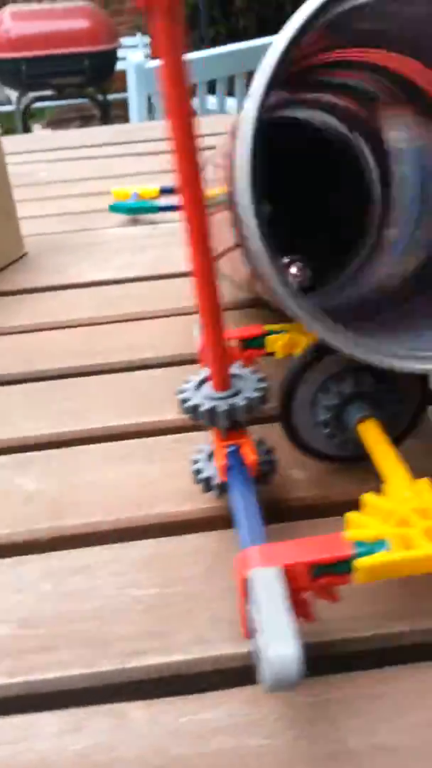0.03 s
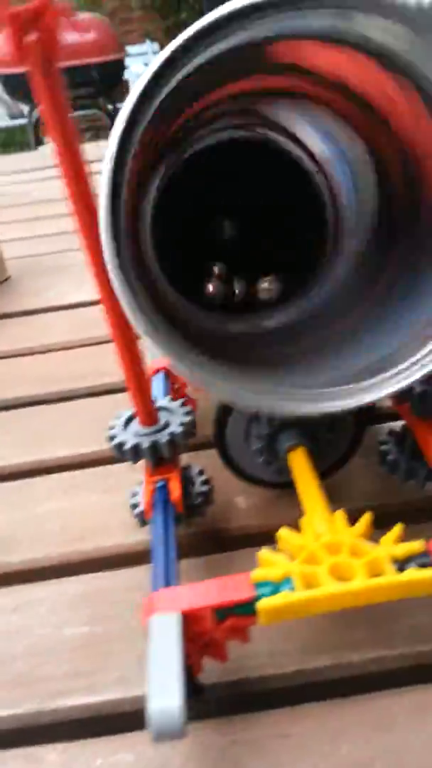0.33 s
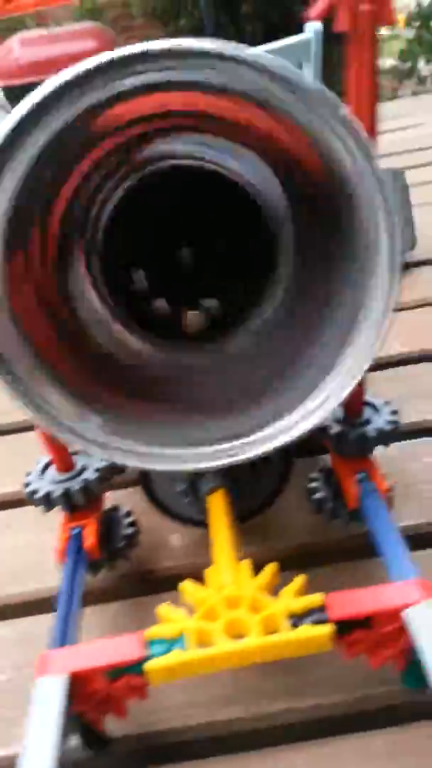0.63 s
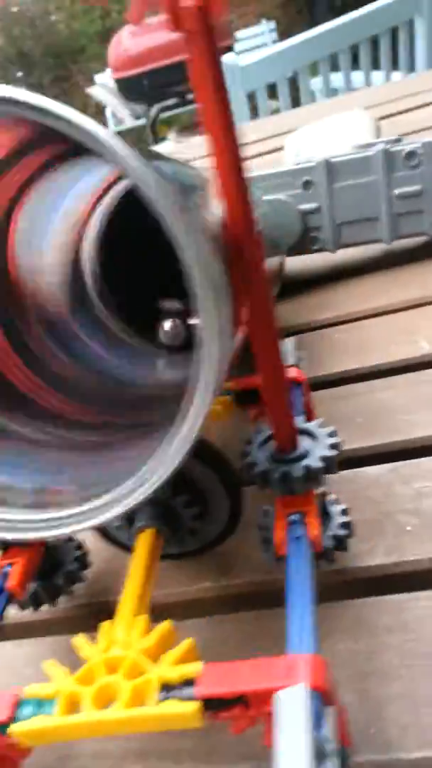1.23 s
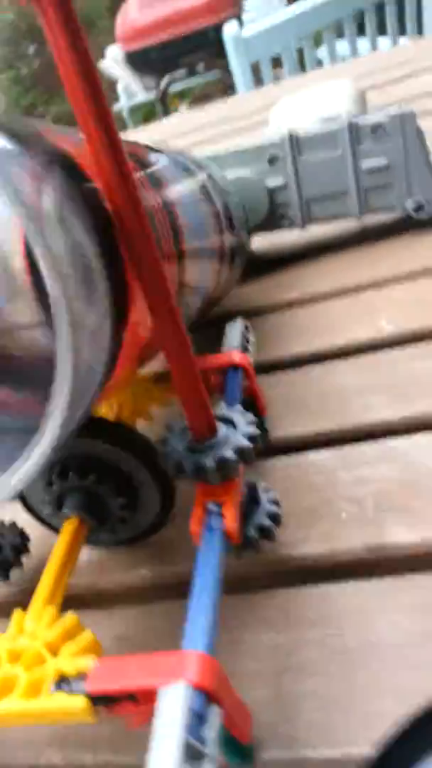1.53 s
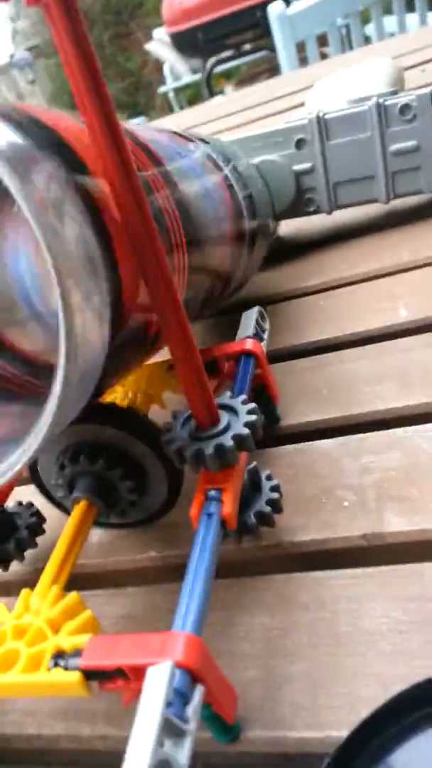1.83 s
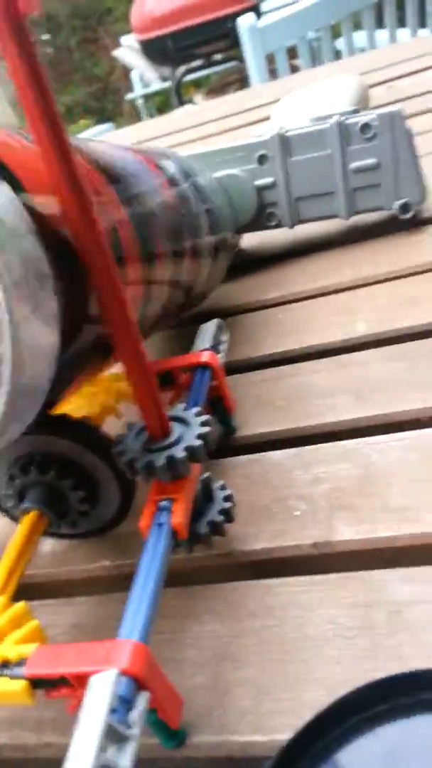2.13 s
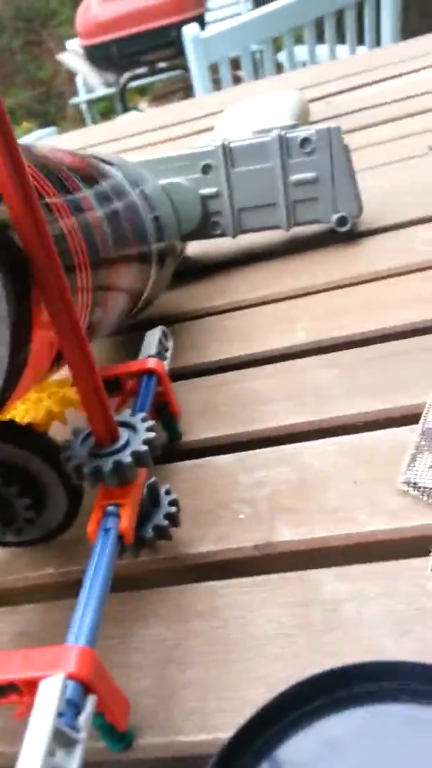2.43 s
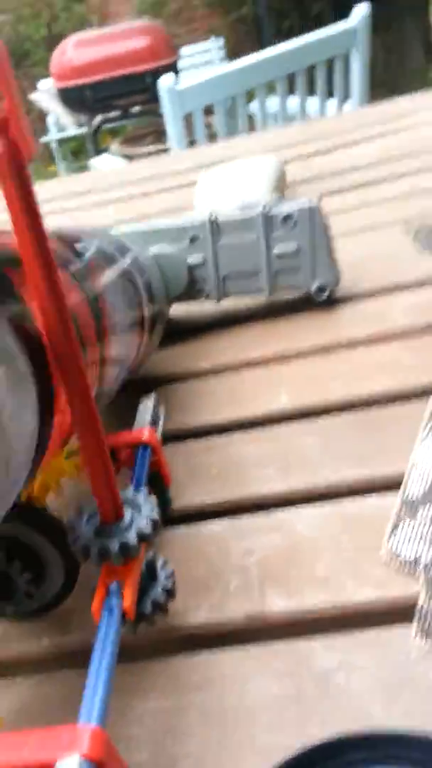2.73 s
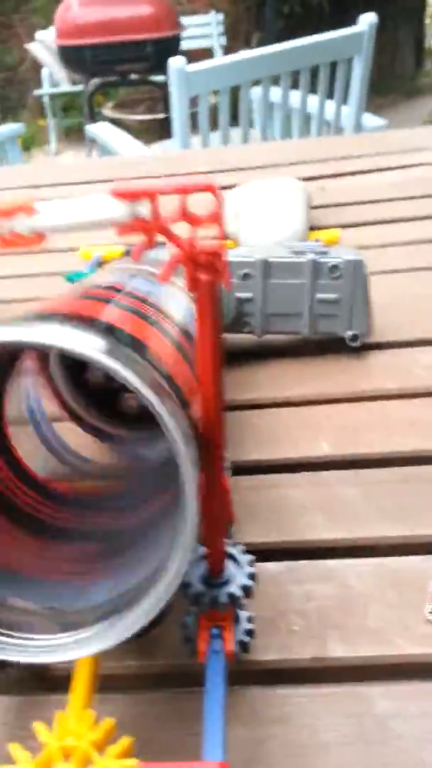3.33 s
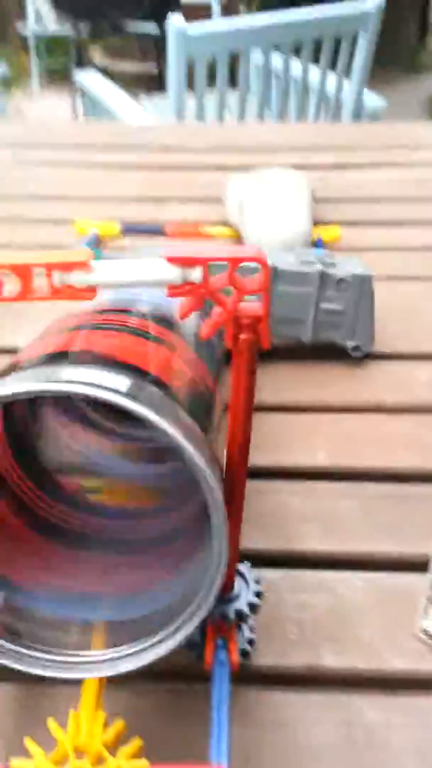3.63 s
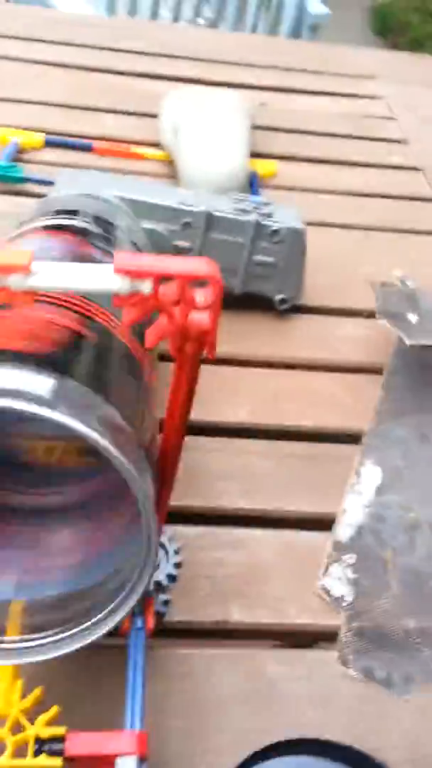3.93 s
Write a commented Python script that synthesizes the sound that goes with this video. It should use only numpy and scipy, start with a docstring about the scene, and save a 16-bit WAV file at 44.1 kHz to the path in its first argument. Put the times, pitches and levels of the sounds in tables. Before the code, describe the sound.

Small geared motor whirring steadily, with metal balls clicking and knocking inside a rotating jar.

```python
"""Outdoors, on a wooden table: a toy motor turns a jar of steel balls through plastic gears.
The frame rumbles on the table and chafes under strain. The gear teeth rasp in their housing;
the motor whirs and surges once per turn of a slow gear. The balls tumble: they knock the jar,
whose air rings with a hollow note, and click against each other.
A close microphone swings from the front of the jar to beside the gears and back."""
import sys
import numpy as np
from scipy import signal
from scipy.fft import rfft, irfft
from scipy.io import wavfile

SR = 44100
rng = np.random.default_rng(int(sys.argv[2]) if len(sys.argv) > 2 else 0)


def output_pcm(signal):
    """Save a mono or channel-first signal as 16-bit PCM at the path in sys.argv[1].

    Samples are clipped to [-1, 1] before scaling.
    """
    pcm = np.clip(np.atleast_2d(signal).T, -1, 1) * 32767
    wavfile.write(sys.argv[1], SR, np.round(pcm).astype(np.int16))


N = 176400
T = np.arange(N) / SR

# microphone swing (leaves front [s], reaches gears [s], leaves gears [s], back in front [s])
MIC_SWING_S = [.6, .95, 2.9, 3.35]
# frame on the table (frequency [Hz], relative density [dB])
RUMBLE_SPECTRUM = [(50, -21.5), (115, -1.5), (180, -6), (260, 9.5), (450, 9), (700, -13), (2000, -57)]
# frame rubs (start [s], length [s])
RUBS = [(0.71, 0.18), (0.944, 0.13), (3.786, 0.13)]
# plastic on plastic (frequency [Hz], relative density [dB])
CHAFE_SPECTRUM = [(600, -5), (1500, 6), (3300, 7.5), (4500, -32)]
# teeth in the housing (frequency [Hz], relative density [dB])
RASP_SPECTRUM = [(500, -3), (800, -5.5), (1500, -4.5), (2100, 2), (2550, 0), (2900, 4), (3300, -0.5),
                 (3950, -3.5), (4300, 2.5), (5030, 3), (6300, -2), (6800, -1.5), (7400, -5.5), (8050, -4),
                 (10000, -11.5), (15000, -29.5)]
# rasp envelope (time [s], level [dB])
RASP_ENVELOPE = [(0, -24.5), (.6, -24.5), (1.1, -23), (2.5, -21.5), (3.05, -25), (3.4, -22.5), (3.7, -24),
                 (4, -23)]
# motor shaft (time [s], mean speed [rev/s], surge depth [rev/s])
MOTOR_SPEED = [(0.0, 157.6, 1.3), (0.16, 158.3, 1.9), (0.4, 157.9, -0.3), (0.64, 159.9, 1.3),
               (0.8, 156.4, 3.9), (0.88, 158.0, 1.8), (1.12, 156.3, 2.0), (1.36, 159.6, 2.6),
               (1.44, 159.0, 0.6), (1.68, 158.8, 2.2), (1.76, 156.7, 2.8), (2.0, 159.8, 0.9),
               (2.08, 157.2, 2.6), (2.32, 158.2, 2.0), (2.4, 157.2, -0.7), (2.64, 159.4, 1.0),
               (2.78, 156.6, 3.4), (2.96, 158.4, 2.2), (3.12, 158.3, 2.5), (3.28, 159.3, 0.9),
               (3.44, 156.6, -0.2), (3.68, 159.0, 0.6), (3.76, 156.2, 2.1), (4.0, 157.4, 1.5)]
# motor and gear lines (order [x shaft speed], level in front [dB], level beside the gears [dB])
MOTOR_LINES = [(9, -39, -42), (10, -42.5, -40.5), (11.25, -45, -44), (12, -36.5, -41), (13, -35.5, -35.5),
               (14, -46, -42), (15, -42, -40), (16, -41, -40), (19, -50, -44), (20, -50, -42),
               (21, -40, -43), (23, -40.5, -46), (24, -48, -45), (27, -47, -38.5), (29, -35, -39),
               (30, -50, -42), (31, -37.5, -33), (32, -34, -34), (33, -42, -41), (34, -45, -41),
               (36, -46, -39.5), (43, -44, -43)]
# whine of the first gear mesh (time [s], level [dB])
WHINE_ENVELOPE = [(0, -32), (.65, -29), (.87, -34), (1.1, -30), (1.45, -26.5), (2.6, -25), (3.2, -29),
                  (3.6, -30), (4, -34)]
# jar hum under rolling balls (frequency [Hz], relative density [dB])
ROLL_SPECTRUM = [(100, -35), (200, -23.5), (255, -27), (330, -25.5), (365, -3.5), (386, 5), (408, -3),
                 (450, -13), (530, -34), (800, -25), (3000, -51)]
# rolling envelope (time [s], relative level [dB])
ROLL_ENVELOPE = [(0.0, -20), (0.16, -27), (0.44, -22), (0.52, -25.5), (0.7, -21), (1.08, -30.5),
                 (1.16, -24.5), (1.32, -26), (1.5, -21), (1.6, -28), (1.76, -25.5), (2.34, -25), (2.5, -26),
                 (2.64, -21.5), (2.82, -29), (2.98, -30), (3.06, -22), (3.18, -27), (3.3, -25), (3.48, -20),
                 (3.7, -33.5), (3.96, -22)]
# jar resonances (frequency [Hz], relative level [dB], T60 [s])
JAR_MODES = [(385.5, 0, 0.099), (601, -23.5, 0.19)]
# ball on jar wall (time [s], relative level [dB])
WALL_KNOCKS = [(0.029, -5.5), (0.0495, -14.5), (0.342, -13), (0.4011, -5), (0.428, -7), (0.4501, -6),
               (0.5554, -11.5), (0.5913, -10), (0.6233, -12), (0.685, -9), (0.709, -7), (0.7457, -12),
               (0.7897, -6), (0.8133, -10), (0.8575, -9.5), (1.12, -8.5), (1.1817, -8.5), (1.2299, -10.5),
               (1.2601, -7.5), (1.4163, -10), (1.493, -5.5), (1.6493, -11.5), (1.7136, -13.5),
               (1.7562, -4.5), (1.8397, -10), (1.8901, -14), (2.0466, -8), (2.0928, -14), (2.164, -9),
               (2.2854, -9.5), (2.3769, -10), (2.41, -8.5), (2.5842, -7.5), (2.641, -14.5), (2.7003, -13),
               (2.7584, -9), (3.024, -11.5), (3.4528, -8), (3.4837, -6.5), (3.8985, -8.5), (3.93, -14.5),
               (3.951, -14)]
# ball on ball (time [s], relative level [dB], pitch [Hz])
BALL_CLICKS = [(0.2335, -16, 7000), (0.251, -15, 6200), (0.337, -13.5, 7900), (0.3455, -20, 7400),
               (0.396, -20.5, 8450), (0.4454, -15, 5300), (0.4502, -15.5, 7360), (0.4554, -13, 7200),
               (0.6498, -19, 5500), (0.7352, -14.5, 7800), (0.7706, -19, 6600), (0.8, -12.5, 6600),
               (0.8556, -7.5, 6460), (0.8934, -13.5, 8400), (0.924, -14, 5950), (0.99, -15.5, 7400),
               (1.0087, -13, 5670), (1.0416, -15, 5300), (1.2046, -16, 8850), (1.2263, -17, 8100),
               (1.2501, -14, 7800), (1.258, -8, 7000), (1.27, -11, 8750), (1.3471, -18, 5800),
               (1.3638, -7, 5700), (1.4613, -11, 6900), (1.5386, -11, 7260), (1.58, -18, 8100),
               (1.7082, -16, 5950), (1.7783, -6.5, 8500), (1.789, -12.5, 7500), (1.8373, -10.5, 5270),
               (1.8707, -14, 7450), (1.876, -17, 8460), (1.8808, -10, 6160), (1.992, -7, 5360),
               (2.1428, -19.5, 8300), (2.2364, -11.5, 7700), (2.2798, -17, 7400), (2.2842, -8.5, 6700),
               (2.3507, -18.5, 8100), (2.4052, -16, 7000), (2.5618, -20, 8000), (2.5909, -6.5, 7650),
               (2.6964, -11.5, 5670), (2.864, -17, 7800), (3.234, -17.5, 6800), (3.2564, -16, 4600),
               (3.3026, -13, 7460), (3.4468, -16, 8000), (3.5033, -14, 6760), (3.5528, -12, 5300),
               (3.7936, -16, 8240), (3.8492, -12, 6450), (3.8614, -11.5, 6200), (3.8983, -16, 8200)]
# noise of a click (frequency [x pitch], relative density [dB])
CLICK_SPECTRUM = [(.1, -29), (.5, 3.5), (1, 6), (1.5, 2), (2.2, -9.5)]


def amp(db):
    """Decibels to gain."""
    return 10 ** (np.asarray(db) / 20)


def unit(x):
    """Scale to rms 1."""
    return x / np.sqrt(np.mean(x ** 2) + 1e-20)


def curve(rows, column=1):
    """Table column, linearly interpolated over time."""
    rows = np.array(rows)
    return np.interp(T, rows[:, 0], rows[:, column])


def colour(x, spectrum):
    """Filter by (frequency [Hz], gain [dB]) points; rms 1."""
    hz, db = np.transpose(spectrum)
    bins_hz = np.fft.rfftfreq(len(x), 1 / SR)
    gain_db = np.interp(np.log(bins_hz + 1), np.log(hz), db)
    return unit(irfft(rfft(x) * amp(gain_db), len(x)))


def drift(cutoff_hz):
    """Low-passed random wander, rms about 1."""
    bins_hz = np.fft.rfftfreq(2048, T[-1] / 2048)
    slow = irfft(rfft(rng.standard_normal(2048)) / (1 + (bins_hz / cutoff_hz) ** 4))
    return np.interp(T, np.linspace(0, T[-1], 2048), unit(slow))


def add(mix, start_s, sound):
    """Mix a sound in at start_s."""
    part = mix[max(round(start_s * SR), 0):][:len(sound)]
    part += sound[:len(part)]


def mic_position():
    """0 in front of the jar, 1 beside the gears."""
    return np.interp(T, MIC_SWING_S, [0, 1, 1, 0])


def frame_rumble(level_db=-32.5):
    """The frame shakes on the table: steady low noise."""
    return amp(level_db) * colour(rng.standard_normal(N), RUMBLE_SPECTRUM)


def rub_pressure():
    """One arch per rub, 0 to 1."""
    return sum(np.sin(np.pi * np.clip((T - start_s) / length_s, 0, 1)) for start_s, length_s in RUBS)


def frame_chafe(level_db=-26.5, grain_db=4.9):
    """Short grainy rubs of plastic on plastic as the motor strains."""
    grains = rng.standard_normal(N) * amp(grain_db * drift(cutoff_hz=380))
    return amp(level_db) * rub_pressure() * colour(grains, CHAFE_SPECTRUM)


def gear_sizzle(level_db=-38, grain_db=5.5, highpass_hz=11000):
    """Fine bright grains from the teeth, heard from beside them."""
    grains = rng.standard_normal(N) * amp(grain_db * drift(cutoff_hz=170))
    bright = signal.lfilter(*signal.butter(2, highpass_hz, "high", fs=SR), grains)
    return amp(level_db) * mic_position() * unit(bright)


def gear_rasp(turns, beat_depth=0.12, flicker_db=2.18, highpass_hz=300):
    """Teeth and brushes scrape in step with the shaft, coloured by the housing."""
    beat = 1 + beat_depth * (np.cos(2 * np.pi * turns) + np.cos(4 * np.pi * turns))
    flicker = amp(flicker_db * drift(cutoff_hz=46))
    scrape = rng.standard_normal(N) * beat * flicker
    scrape = signal.lfilter(*signal.butter(2, highpass_hz, "high", fs=SR), scrape)
    return amp(curve(RASP_ENVELOPE)) * colour(scrape, RASP_SPECTRUM)


def gear_cycle(lag_rev=0, ratio=16, peak_rev=.07):
    """One cosine cycle per turn of the slow gear."""
    gear_turns = np.cumsum(curve(MOTOR_SPEED)) / SR / ratio
    return np.cos(2 * np.pi * (gear_turns - peak_rev - lag_rev))


def motor_turns(flutter=0.0011):
    """Shaft angle [rev]; the load eases and tightens once per slow gear turn."""
    speed_hz = curve(MOTOR_SPEED) + curve(MOTOR_SPEED, column=2) * gear_cycle()
    return np.cumsum(speed_hz * (1 + flutter * drift(cutoff_hz=63))) / SR


def mesh_whine(turns, order=18, throb_db=3.2):
    """The first gear mesh sings under load, just after each surge; it throbs half as deep in front."""
    throb = (1 + mic_position()) / 2 * gear_cycle(lag_rev=0.22)
    level_db = curve(WHINE_ENVELOPE) + throb_db * throb + drift(cutoff_hz=38)
    return np.sqrt(2) * amp(level_db) * np.sin(2 * np.pi * order * turns)


def motor_whir(turns, waver_db=2.5, rub_damping_db=4):
    """Wavering lines at multiples of the shaft speed, damped by each rub."""
    out = np.zeros(N)
    beside = mic_position()
    dip_db = rub_damping_db * rub_pressure()
    for order, front_db, beside_db in MOTOR_LINES:
        level_db = front_db + beside * (beside_db - front_db) - dip_db
        level_db += waver_db * drift(cutoff_hz=16.5)
        out += amp(level_db) * np.sin(2 * np.pi * (order * turns + rng.random()))
    return np.sqrt(2) * out


def jar_hum(gain_db=-2.5):
    """Rolling balls keep the jar humming."""
    return amp(gain_db + curve(ROLL_ENVELOPE)) * colour(rng.standard_normal(N), ROLL_SPECTRUM)


def jar_knocks(gain_db=-1.43, rise_s=0.0013, highpass_hz=190, thud_gain_db=-17, thud_t60_s=.09):
    """Balls drop on the wall: the air in the jar rings hollow and the frame thuds."""
    out = np.zeros(N)
    t = np.arange(SR // 6) / SR
    rise = 1 - np.exp(-t / rise_s)
    ring = sum(amp(db - 60 * t / t60_s) * np.sin(2 * np.pi * hz * t) for hz, db, t60_s in JAR_MODES)
    # a small jar radiates little bass
    ring = signal.lfilter(*signal.butter(2, highpass_hz, "high", fs=SR), ring * rise)
    thud_envelope = rise * amp(thud_gain_db - 60 * t / thud_t60_s)
    for start_s, db in WALL_KNOCKS:
        thud = thud_envelope * colour(rng.standard_normal(len(t)), RUMBLE_SPECTRUM)
        add(out, start_s, amp(gain_db + db) * (ring + thud))
    return out


def click(db, hz, rise_s=0.00029, t60_s=0.0052, tail_gain_db=-15, tail_t60_s=.025):
    """Steel on steel: a few bright cycles and a crack, then brief scatter inside the jar."""
    t = np.arange(1024) / SR
    tone = np.sqrt(2) * np.sin(2 * np.pi * hz * t)
    grit = colour(rng.standard_normal(len(t)), np.array(CLICK_SPECTRUM) * [hz, 1])
    contact = (tone + 1.4 * grit) * amp(-60 * t / t60_s)
    scatter = grit * amp(tail_gain_db - 60 * t / tail_t60_s)
    return amp(db) * np.minimum(t / rise_s, 1) * (contact + scatter)


def ball_clatter(click_gain_db=5, ticks_per_s=70, tick_db=-17, tick_spread_db=12.5, crowding=1.3):
    """Balls collide: hard clicks, and light ticks that crowd where the rolling is loud."""
    out = np.zeros(N)
    for start_s, db, hz in BALL_CLICKS:
        add(out, start_s, click(click_gain_db + db, hz))
    tumbling = np.cumsum(amp(curve(ROLL_ENVELOPE)) ** crowding)
    for when, softness, pitch in rng.random((int(ticks_per_s * T[-1]), 3)):
        start_s = np.interp(when, tumbling / tumbling[-1], T)
        add(out, start_s, click(tick_db - tick_spread_db * softness, hz=5500 + 7000 * pitch))
    return out


def scene(side_gain_db=-52.5):
    """All sources centred; a faint independent rasp is added in opposite phase to the two channels."""
    turns = motor_turns()
    frame = frame_rumble() + frame_chafe()
    drive = gear_sizzle() + gear_rasp(turns) + mesh_whine(turns) + motor_whir(turns)
    balls = jar_hum() + jar_knocks() + ball_clatter()
    side = amp(side_gain_db) * gear_rasp(turns)
    return frame + drive + balls + side * np.array([[1], [-1]])


def record(dry, ceiling=0.85, lowpass_hz=15150):
    """Overload on the sharpest clicks, then a band limit."""
    clipped = np.clip(dry, -ceiling, ceiling)
    lowpass = signal.firwin(301, lowpass_hz, window=("kaiser", 8), fs=SR)
    return signal.oaconvolve(clipped, lowpass[None], "same")


dry = scene()
out = record(dry)
output_pcm(out)
```